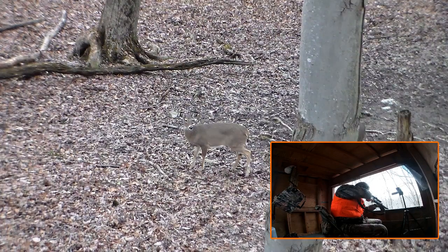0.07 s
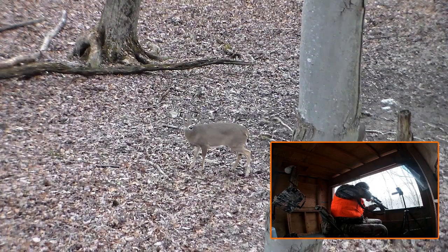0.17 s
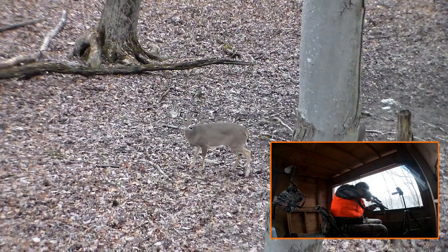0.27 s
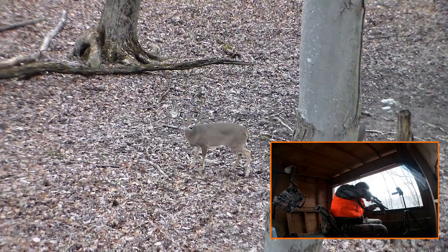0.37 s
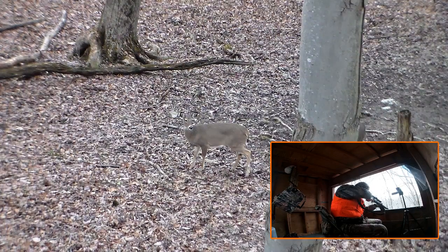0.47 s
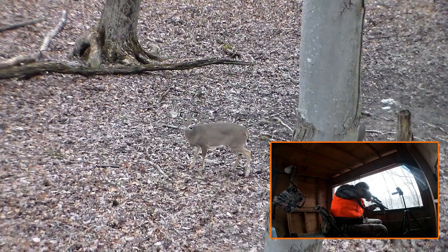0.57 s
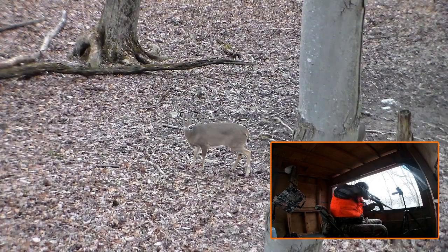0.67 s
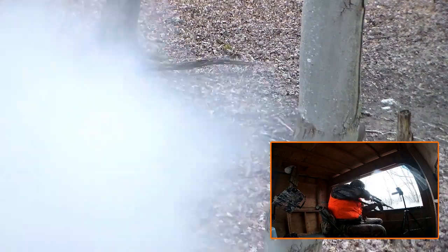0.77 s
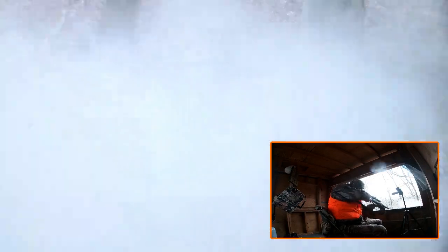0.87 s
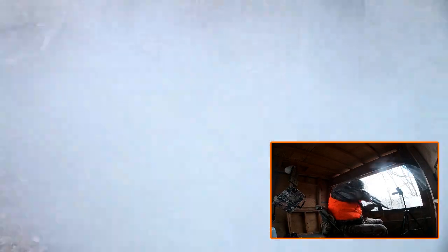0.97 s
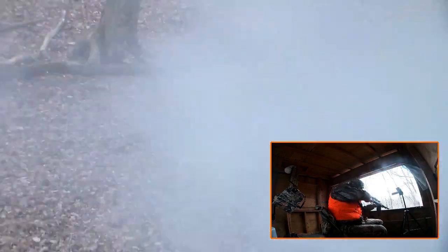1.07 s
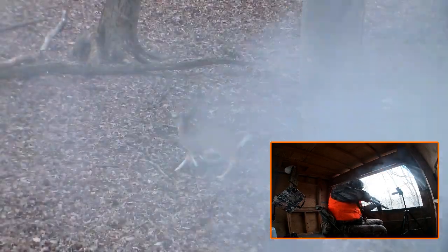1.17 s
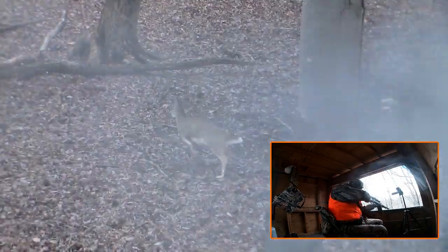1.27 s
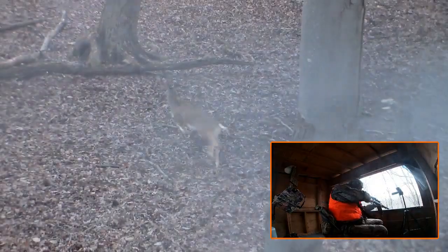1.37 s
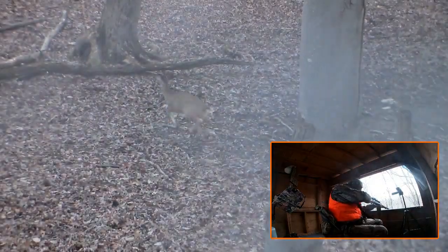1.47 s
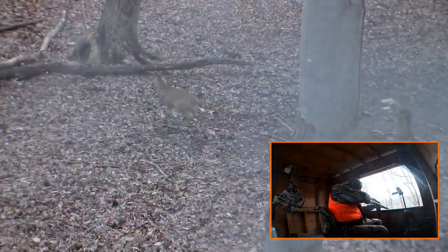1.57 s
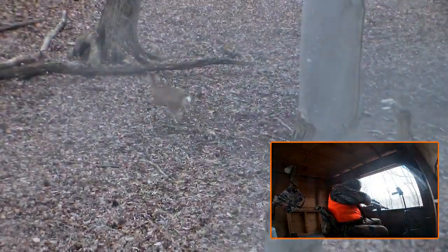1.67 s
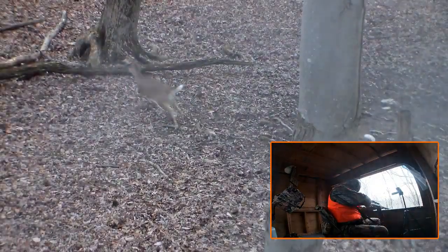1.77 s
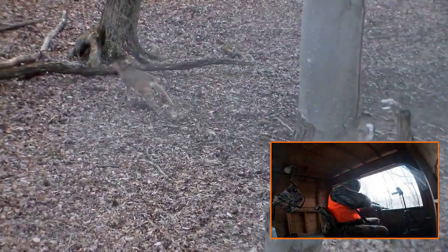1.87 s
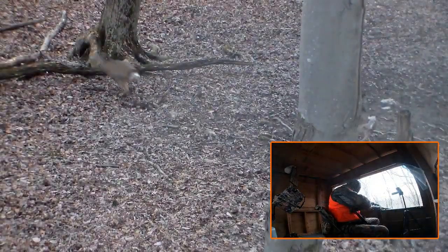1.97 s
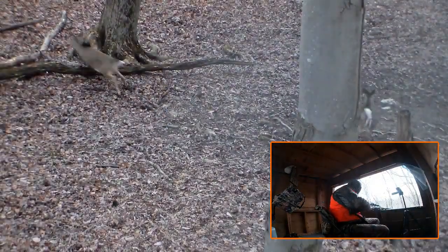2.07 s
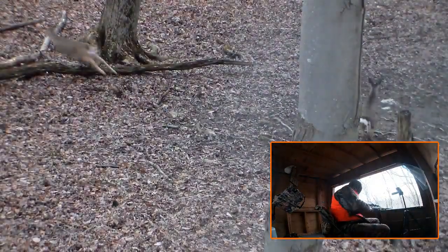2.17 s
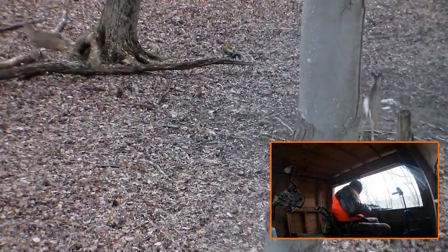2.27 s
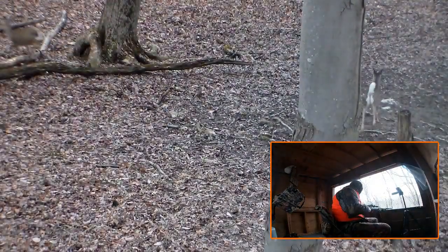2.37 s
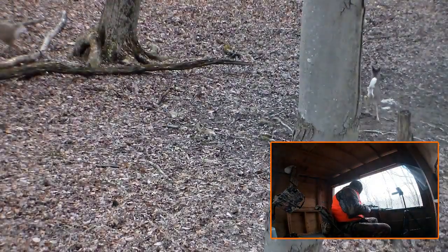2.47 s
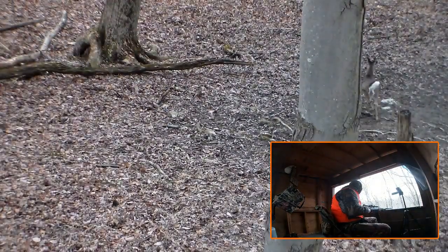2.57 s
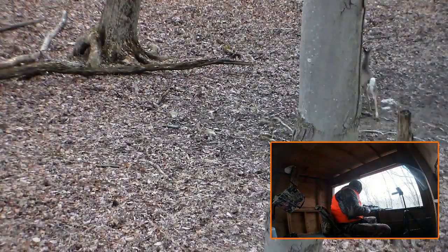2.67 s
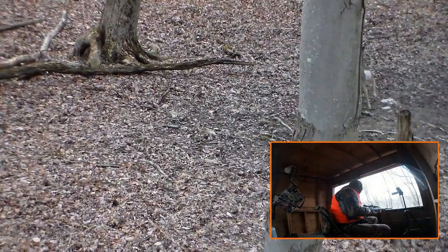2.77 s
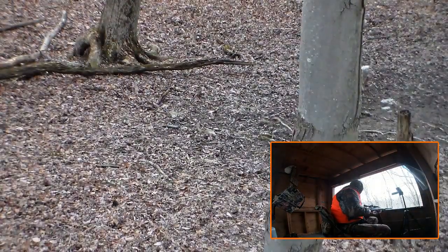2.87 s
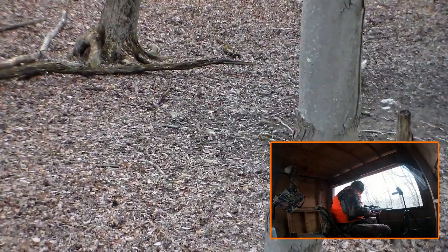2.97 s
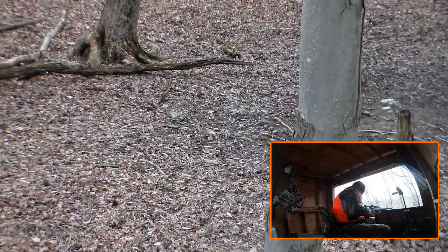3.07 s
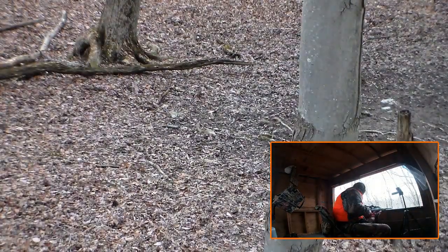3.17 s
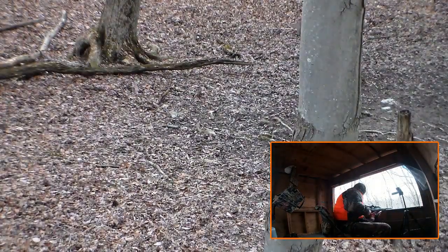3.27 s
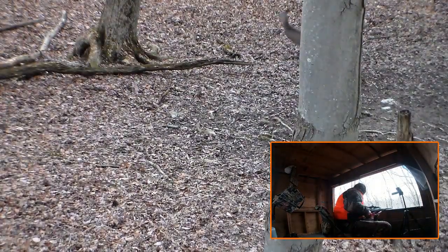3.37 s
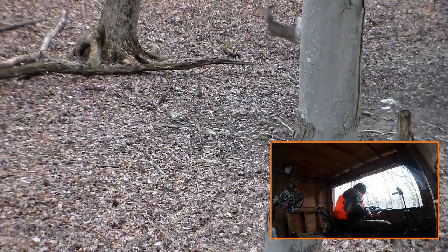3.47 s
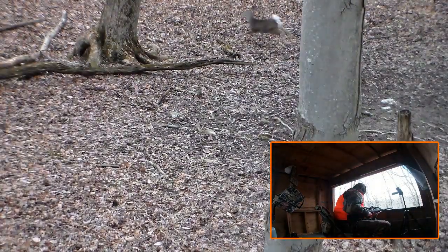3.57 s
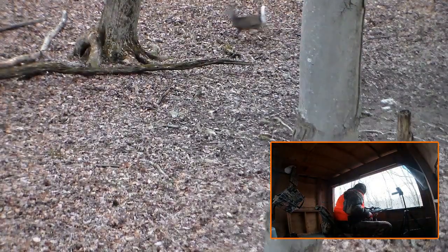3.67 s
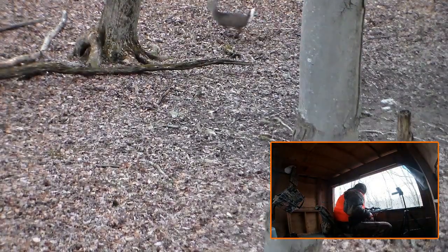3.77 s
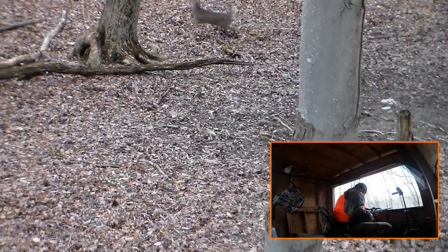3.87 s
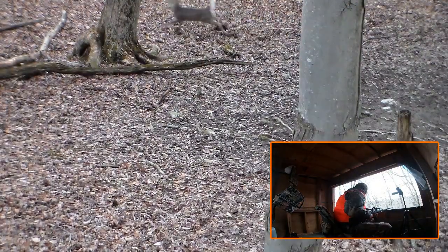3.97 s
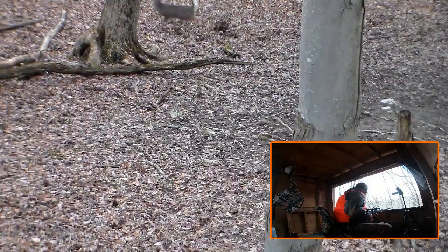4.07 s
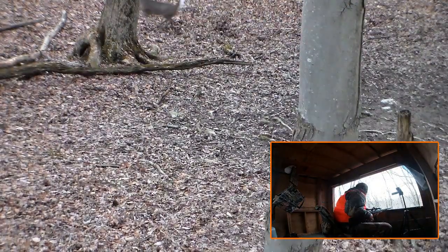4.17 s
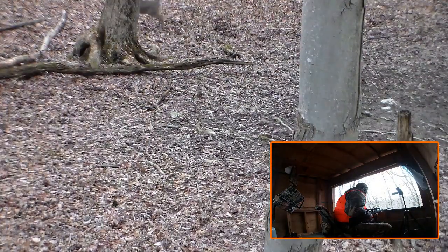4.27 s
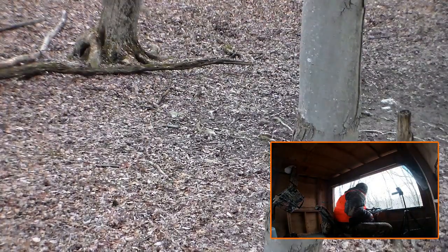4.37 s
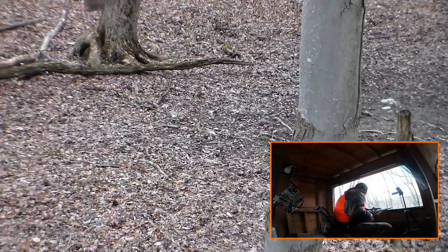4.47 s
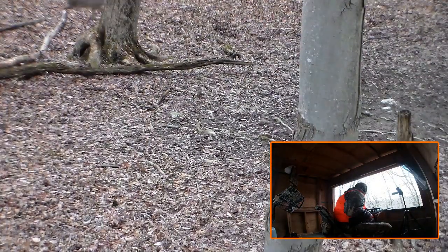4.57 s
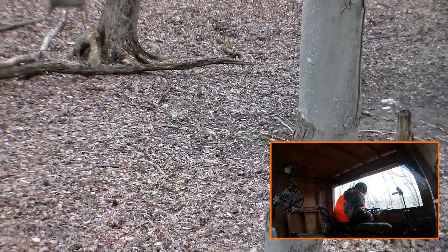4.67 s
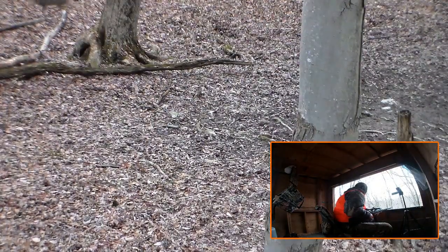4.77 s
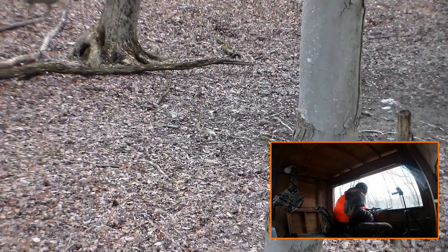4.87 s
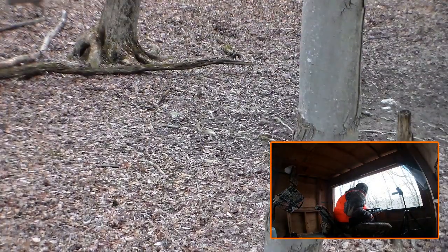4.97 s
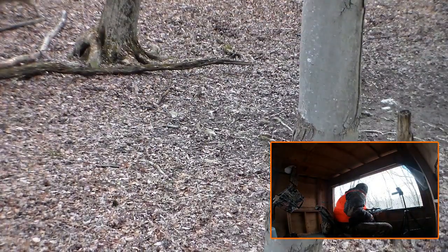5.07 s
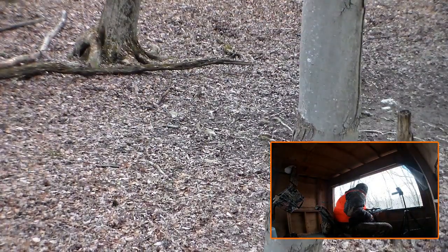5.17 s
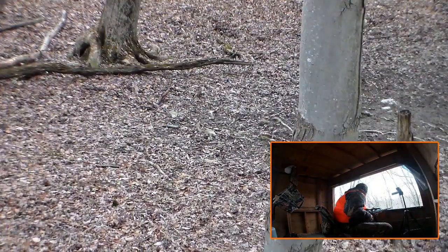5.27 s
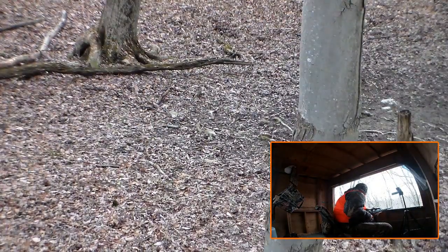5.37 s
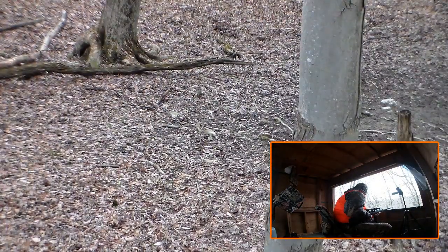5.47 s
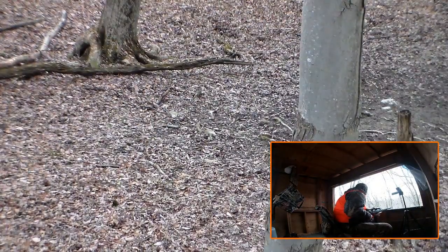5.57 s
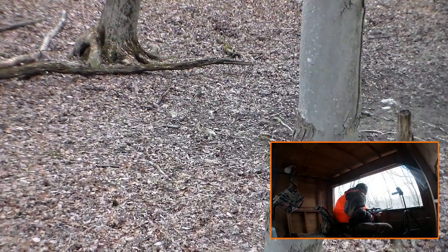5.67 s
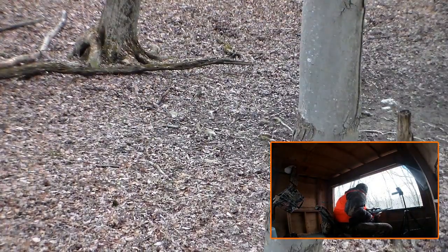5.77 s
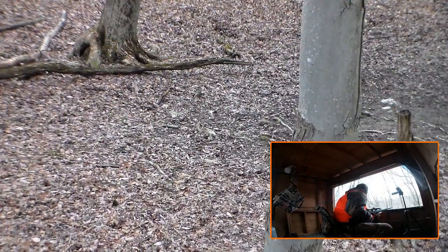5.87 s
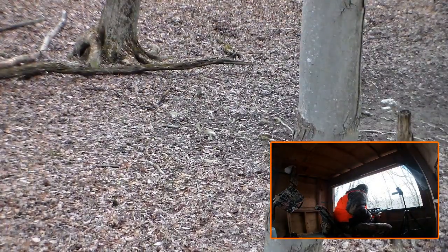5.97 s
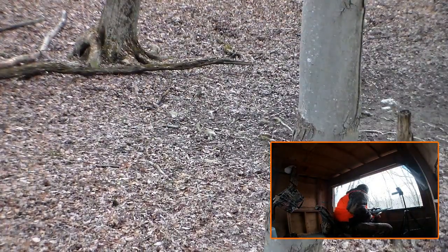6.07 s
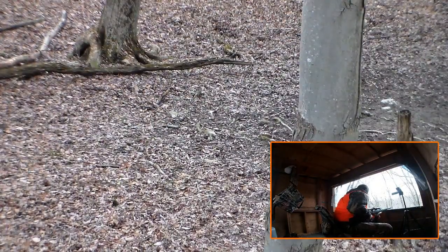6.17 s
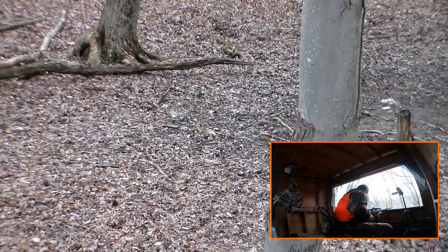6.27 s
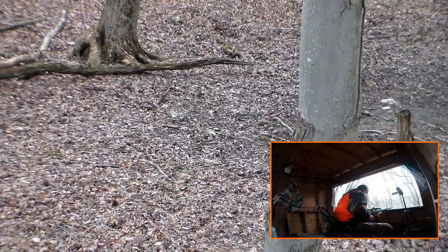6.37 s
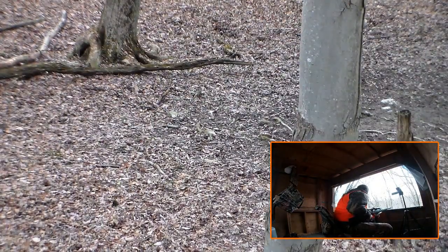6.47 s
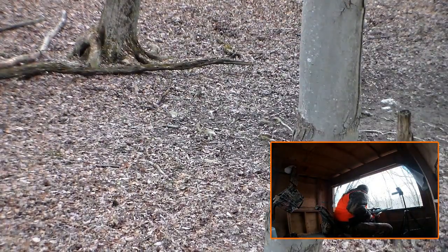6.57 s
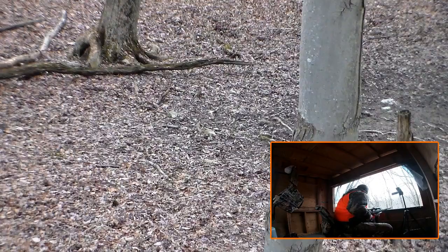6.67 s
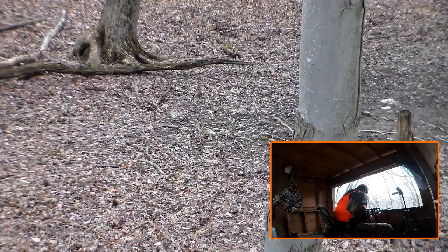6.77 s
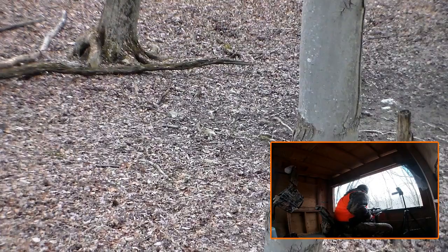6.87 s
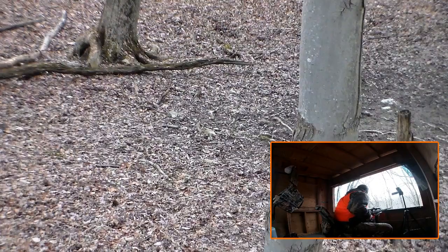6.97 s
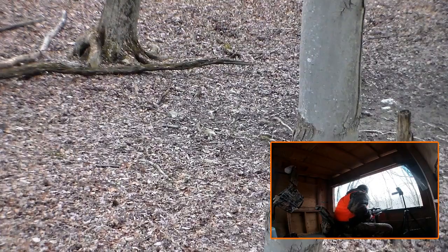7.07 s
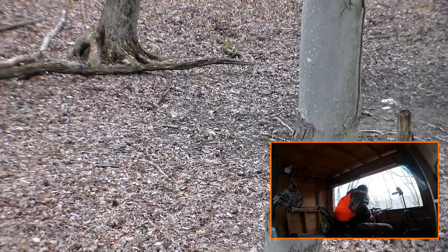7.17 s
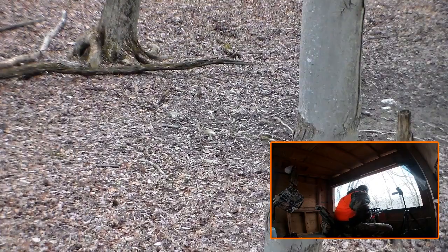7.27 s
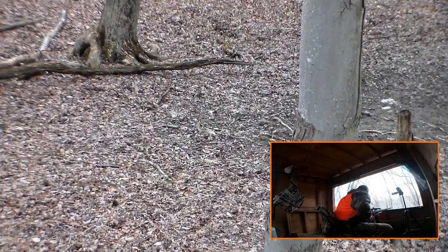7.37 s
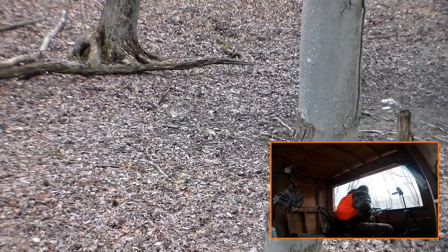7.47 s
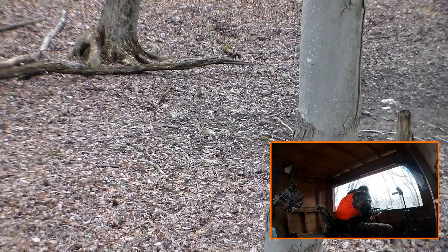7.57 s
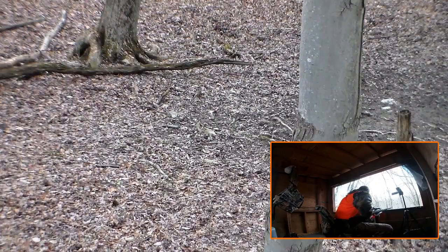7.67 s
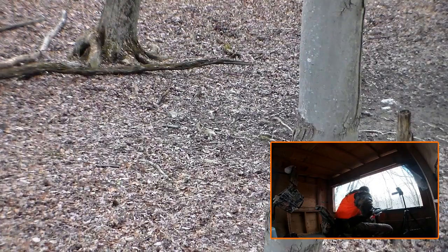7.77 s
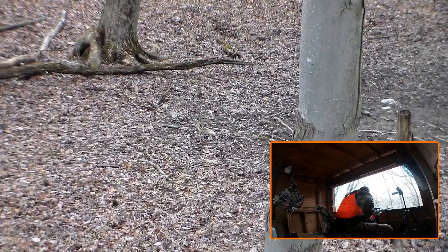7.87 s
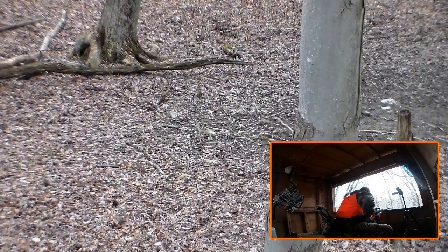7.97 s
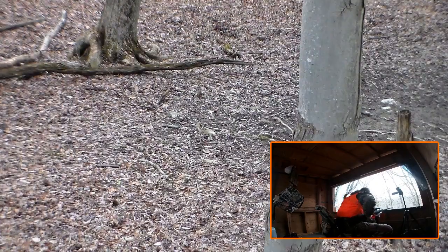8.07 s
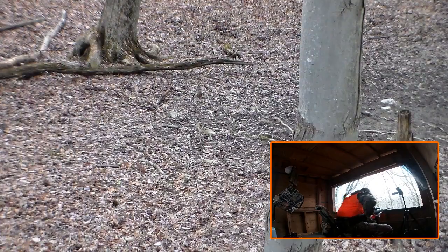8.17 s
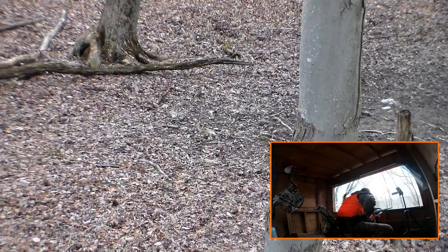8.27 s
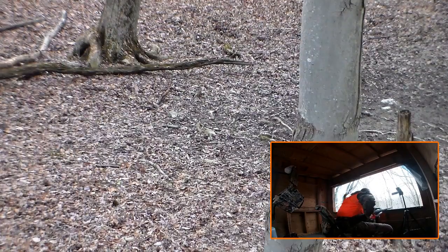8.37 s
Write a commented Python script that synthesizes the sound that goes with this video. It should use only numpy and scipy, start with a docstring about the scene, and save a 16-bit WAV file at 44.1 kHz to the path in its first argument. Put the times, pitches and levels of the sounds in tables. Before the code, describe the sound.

Wind thumps against an outdoor stereo microphone for under a second, then a muzzle-loading rifle goes off close by, loud enough to overload it. Sharp echoes slap back from nearby trunks, and a dull roll with a low note returns from the hills for several seconds. Beneath it deer flee through dry leaves, crunching and snapping twigs, gradually fading toward the left.

```python
"""A black-powder rifle fires close by in bare woodland: a pressure pulse strong enough to overload the recorder.
Noise that fades at its own rate in each pitch range is the scatter off nearby trunks, with a few sharper echoes.
The hills roll the shot back for seconds, as noise that grows ever duller, over a low note.
Startled deer bound off through dry leaves: patchy noise, with crunches and short ringing twig snaps.
Gusts are low noise that swells, and single pops, on both microphone ports; the recorder hisses quietly."""
import sys
import numpy as np
from scipy import signal
from scipy.fft import rfft, irfft, next_fast_len
from scipy.io import wavfile
from scipy.ndimage import uniform_filter1d, map_coordinates

SR = 44100
rng = np.random.default_rng(int(sys.argv[2]) if len(sys.argv) > 2 else 0)


def to_wav(s):
    """Save 16-bit WAV."""
    ch = np.atleast_2d(s).T  # columns
    pcm = np.round(np.clip(ch, -1, 1) * 32767)  # PCM
    wavfile.write(sys.argv[1], SR, pcm.astype(np.int16))


N = 370704
TIME = np.arange(N) / SR

# In every tone table only the balance between pitches counts: the noise is scaled to rms 1 afterwards.
# Likeness: 1 = the same sound in both ports, 0 = unrelated. Left-right: above 0 = louder on the left.

# Gusts: t/s, buffeting level/dB, left-right/dB
GUSTS = [(0.0, -49, 0), (0.21, -52, 8), (0.25, -37, 1), (0.3, -42.5, 6), (0.36, -32, 1), (0.52, -29, 3.5),
         (0.63, -32, 4), (0.68, -43.5, 6), (0.85, -32.5, 9), (1.3, -49, -1), (1.9, -43.5, 6),
         (2.3, -36.5, 8), (2.55, -46.5, -4), (3.17, -35, 6), (3.35, -39.5, 2), (3.65, -38, 1),
         (4.3, -45.5, 0), (4.8, -44, 3), (5.4, -43.5, 4), (5.65, -29, 2), (5.78, -43, 7), (5.95, -36, 1),
         (6.2, -36, 2.5), (6.5, -39.5, 3), (6.8, -46, -7), (7.2, -44, 5.5), (7.5, -48, 1), (7.67, -32, 1),
         (7.85, -41.5, 3), (8.41, -48, -2)]
# Tone of the buffeting: f/Hz, level per Hz/dB
BUFFET_TONE = [(35, -13.5), (60, 2), (100, 2), (180, -13), (300, -22), (500, -49.5), (1500, -110)]
# Tone of the deepest moving air, and of the higher thumps: f/Hz, level per Hz/dB
RUMBLE_TONE = [(8, -17), (20, 14.0), (45, 11.5), (70, -33.5), (300, -110)]
THUMP_TONE = [(80, -19.5), (160, 7.5), (300, -10.5), (600, -28.5), (1200, -47.5), (3000, -110)]
# How alike the ports are in rumble, buffeting, thumps and hiss: f/Hz, likeness
RUMBLE_ALIKE, BUFFET_ALIKE, THUMP_ALIKE, HISS_ALIKE = [(30, .46)], [(100, .1)], [(100, .08)], [(500, .1)]
# Single eddies that pop: t/s, peak level/dB, f/Hz, left-right/dB
EDDIES = [(0.325, -27.5, 100, 0), (0.376, -17.5, 184, 30), (.392, -17, 123, 30), (0.406, -17, 124, -30),
          (0.476, -19, 130, -27), (0.487, -18, 169, 30), (0.506, -15.5, 220, 30), (0.522, -14, 159, 8),
          (0.532, -18, 264, 30), (0.569, -18.5, 109, 30), (0.625, -16, 119, 30), (0.723, -25, 125, 10),
          (5.669, -20, 88, 9), (5.871, -20.5, 90, 6), (5.975, -23, 122, -13), (6.074, -31, 110, 17),
          (6.18, -20, 110, -14), (6.218, -21, 100, 12), (7.36, -18.5, 129, 17), (7.642, -18, 100, 20),
          (7.687, -20, 90, 8), (7.79, -22, 196, 12), (7.834, -25.5, 121, -11), (7.863, -29.5, 300, 3)]
# Tone of the recorder's own noise: f/Hz, level per Hz/dB
HISS_TONE = [(200, -30), (320, -2), (500, 1), (1250, -9), (1350, -8), (2160, -10), (7480, -15.5),
             (14000, -16.5)]
# The cap, which fires just before the blast: t/s, level/dB, time to fall 60 dB/s
CAP_BURST = (.8635, -21, .15)
# Tone of the cap: f/Hz, level per Hz/dB
CAP_TONE = [(800, -25), (2600, 0), (5000, -6), (7500, -8), (14000, -16)]
# Scatter off near trunks, plus the ring of the hunting blind near 186 Hz: f/Hz, level per Hz/dB, build-up/s,
# longest time to fall 60 dB/s
TRUNKS = [(25, 0, 0.026, 0.39), (60, 4.5, .04, .35), (116.7, 8.5, 0.069, 0.33), (186, 22.5, 0.051, 0.42),
          (279.7, 15, .035, 0.21), (367, 17, 0.051, 0.51), (576, 14, 0.019, 0.33), (835, 12.5, 0.039, 0.45),
          (1500, 5, 0.024, 0.44), (2703, 4.5, .002, 0.44), (4970, -2.5, .001, 0.43),
          (7550, -7.5, 0.0011, 0.48), (12100, -7, 0.0011, 0.43)]
# How alike the ports are in the cap, trunks and slaps: f/Hz, likeness
TRUNKS_ALIKE = [(60, 0.93), (230, 0.98), (900, 0.99), (3510, 0.59), (13600, 0.073)]
# Distinct echoes off big trunks and banks: t/s, level/dB, time to fall 60 dB/s
SLAP_ECHOES = [(0.983, -1.5, 0.07), (1.013, -5.5, 0.06), (1.077, -11.5, 0.24), (1.123, -16, 0.11),
               (1.164, -21, 0.039), (1.216, -14.5, 0.037), (1.25, -24, .05)]
# Tone of those echoes before air loss: f/Hz, level per Hz/dB
SLAP_ECHO_TONE = [(100, -20.5), (300, -6), (900, 2), (2000, -11), (4200, -9), (8000, -27), (15000, -31)]
# Loss in the air on the way, used for the hills and, multiplied, for the slaps: f/Hz, loss per second/dB
AIR_LOSS = [(200, -1), (500, -0.47), (1000, 1.5), (2000, 5), (4000, 22.5), (8000, 45)]
# Echo off the hills: t/s, level of the roll/dB, level of the low note over the roll/dB
HILL_LEVELS = [(1.1, -14, 4.5), (1.29, -29, -8), (1.4, -28.5, -3.5), (1.5, -25, -7.5), (1.8, -24, -9.5),
               (2.03, -27, -12), (2.3, -31.5, -9), (2.5, -32.5, -3.5), (2.65, -31.5, -3), (3.0, -30, 0),
               (3.3, -31, -3), (4.0, -33, -3), (4.6, -35.5, -4.5), (5.0, -35.5, -6), (5.3, -38, -4),
               (5.55, -43.5, -6), (6.05, -50.5, -2), (7.0, -57, -5)]
# Tone of the roll at 1.6 s, brighter before and duller after: f/Hz, level per Hz/dB
ROLL_TONE = [(150, -37), (250, 0.5), (304, -3), (509, -1), (940, -3.5), (1710, -11.5), (2430, -15.5),
             (3160, -19.5), (7000, -49), (9100, -56), (15400, -120)]
# Tone of the valley's low note: f/Hz, level per Hz/dB
BOOM_TONE = [(90, -28), (130, 6), (160, 13), (190, 18), (230, 19), (270, -9), (330, -32), (600, -100)]
# How alike the ports are in the hill echo: f/Hz, likeness
HILL_LIKENESS = [(60, 1), (230, 1), (900, 0.98), (3510, 0.84), (13600, 0.18)]
# Many hooves in leaf litter: t/s, level/dB
RUSTLE_LEVELS = [(1.25, -64), (1.6, -56.5), (1.85, -49.5), (2.0, -43.5), (2.4, -41), (2.8, -43), (3.1, -44),
                 (3.4, -44.5), (3.8, -46.5), (4.1, -45), (4.5, -47), (4.75, -51.5), (4.98, -53),
                 (5.15, -47.5), (5.3, -52), (5.6, -50.5), (5.84, -52), (6.0, -50), (6.42, -48.5),
                 (6.55, -53.5), (6.82, -57), (6.92, -52), (7.1, -51.5), (7.3, -56), (7.7, -48), (8.41, -49)]
# Tone of the leaves: f/Hz, level per Hz/dB
LEAF_TONE = [(250, -14), (400, -3), (550, -6), (950, -7), (1600, -9), (2100, -10), (3000, -8.5), (3600, -8),
             (4200, -10), (5000, -12.5), (8000, -16), (11000, -19.5), (14000, -23)]
# How alike the ports are in the leaves: f/Hz, likeness
LEAF_LIKENESS = [(500, 0.97), (1500, 0.94), (4000, 0.81), (8000, 0.23), (14000, 0.37)]
# Landings that snap a twig, snap and spray before their tone: t/s, snap peak level/dB, f/Hz,
# leaf spray level/dB, crunch level/dB
LANDINGS = [(1.8524, -32, 2040, -49, -46), (1.935, -40, 4500, -54, -42), (2.143, -15.5, 3600, -33, -27),
            (2.507, -29, 3550, -48, -42), (2.5366, -26, 4410, -37, -32), (2.64, -20.5, 3450, -52, -31),
            (2.80, -40, 3500, -43, -38), (2.9176, -12, 3520, -34.5, -48), (3.0131, -28, 4010, -44, -39),
            (3.173, -16, 3040, -37, -33.5), (3.26, -40, 3500, -45, -43), (3.38, -44, 3500, -51, -46),
            (3.6601, -29, 2970, -43, -42), (3.716, -37, 3640, -41, -41), (3.8157, -38, 4300, -44, -48),
            (3.8651, -29, 3730, -48, -53), (3.98, -42, 3500, -51, -44), (4.114, -37, 3600, -38, -48),
            (4.151, -27, 2980, -43, -52), (4.6228, -41, 3350, -51, -44), (4.8439, -35, 2830, -46, -46),
            (5.0605, -43, 2910, -55, -44), (5.3705, -37, 2980, -46.5, -49), (5.878, -37, 2600, -49, -45),
            (5.9194, -38, 3110, -47, -55), (6.3903, -40, 3100, -47, -50), (7.004, -34, 2930, -51, -55),
            (7.3218, -48.5, 3840, -54, -50), (7.7895, -45, 2380, -61, -58), (7.861, -41, 3360, -58, -61)]
# Tone of the crunch: f/Hz, level per Hz/dB
CRUNCH_TONE = [(700, -30), (2000, -6), (3300, 1), (5000, -2), (9500, -6.5), (14000, -14)]
# Tone of the snaps and sprays, here a plain gain: f/Hz, gain/dB
SNAP_TONE = [(600, -39), (1800, 6.5), (4300, 2), (6000, -6), (14000, -10)]
# The deer move left: t/s, how much later the right port hears them/microseconds
DEER_BEARING = [(1.6, -9), (3.5, 23), (5, 26), (6, 38), (8.41, 48)]

FLURRY_DB, FLURRY_PER_S = 1.7, 11  # short flurries on the gusts
SWAY_DB = 2.5  # how far the flurries wander between the ports
RUMBLE_DB, RUMBLE_FOLLOWS = -45, .4  # deepest air: middle level, share of the gust's swing
RUMBLE_HEAVE_DB, RUMBLE_HEAVES_PER_S = 3, 7  # its own slow heave
THUMP_DB = 21.5  # gain on the square of the buffeting level
HISS_DB = -60
SHOT_S = .8726  # the muzzle blast arrives
TRUNK_AIR_DB_PER_S = 30.5  # air loss among the trunks at 12 kHz
FADE_S, FADE_DB_PER_S = 6.9, 3  # the last slope has answered: an extra fade starts
PEAL_DB, BOOM_BEAT_DB, BOOM_BEAT_PER_S = 0.82, 0.5, 9  # how unevenly the slopes answer
SHUFFLE_DB, SHUFFLE_PER_S = 0.94, 15  # the rustle comes and goes with the strides
CRUNCH_RISE_S, CRUNCH_T60_S = 0.0074, 0.11  # build-up, and time to fall 60 dB up to 2 s
SMEAR_PER_S = .3  # crunches last longer by this share for each second after 2 s, as the deer get away
TOP_HZ = 14250  # about the highest pitch kept


def amp(db):
    """Turn decibels into a plain multiplier."""
    return 10 ** (np.asarray(db) / 20)


def unit(x):
    """Scale a signal to rms 1."""
    return x / np.sqrt(np.mean(x ** 2) + 1e-20)


def along(points, hz, axis=1):
    """Read one column of a table that starts with f/Hz, with pitch on a log scale."""
    rows = np.array(points, float)
    return np.interp(np.log(hz + 1), np.log(rows[:, 0] + 1), rows[:, axis])


def curves(rows):
    """Draw each column after t/s as a curve with one value per sample."""
    s, *columns = np.transpose(rows)
    return [np.interp(TIME, s, column) for column in columns]


def wobble(rate):
    """Draw a smooth random curve with rate random points a second."""
    points = rng.standard_normal(int(N * rate / SR) + 4)
    return map_coordinates(points, [TIME * rate])


def filtered(x, response):
    """Multiply each frequency of x by response(hz)."""
    size = next_fast_len(N + SR // 2)
    hz = np.fft.rfftfreq(size, 1 / SR)
    return irfft(rfft(x, size) * response(hz), size)[..., :N]


def rush(spectrum, alike):
    """Steady stereo noise of rms 1: a shared part plus a part of opposite sign in the two ports."""
    def response(hz):
        turn = np.arccos(np.clip(along(alike, hz), -1, 1)) / 2
        return amp(along(spectrum, hz)) * [np.cos(turn), np.sin(turn)]
    mid, side = filtered(rng.standard_normal((2, N)), response)
    return unit(np.array([mid + side, mid - side]))


def shaped(x, gain, size):
    """Change the tone of x over time: multiply by gain(hz, s) in short slices."""
    hz, s, slices = signal.stft(x, SR, nperseg=size)
    return signal.istft(slices * gain(hz[:, None], s[None]), SR, nperseg=size)[1][:, :N]


def burst(s, db, t60, rise):
    """Envelope that swells fast from time s and dies away by 60 dB in t60 seconds."""
    age = np.clip(TIME - s, 0, 5)
    return (1 - np.exp(-age / rise)) * amp(db - 60 * age / np.abs(t60))


def panned(lean_db):
    """Left and right gains that differ by lean_db."""
    return amp(np.array([[.5], [-.5]]) * lean_db)


def eddies():
    """Single eddies pop as one short swing of air, often weaker on one port."""
    half = SR // 10
    pops, t = np.zeros((2, N + SR)), np.arange(-half, half) / SR
    phases = rng.uniform(0, 2 * np.pi, len(EDDIES))
    for (s, db, hz, lean_db), phase in zip(EDDIES, phases):
        u = 2 * np.pi * hz * t
        swing = np.sin(u + phase) * (1 + (u / 2.8) ** 2) ** -3
        ports = amp([[db + min(lean_db, 0)], [db - max(lean_db, 0)]])  # only the weaker port is lowered
        start = round(s * SR) - half
        pops[:, start:start + len(t)] += ports * swing
    return pops[:, :N]


def wind():
    """Eddies thump on each port apart; thumps above the buffeting grow with the square of the gust."""
    gust_db, lean_db = curves(GUSTS)
    lumps = amp(6 * np.tanh(np.array([wobble(25), wobble(25)])))
    heave_db = RUMBLE_DB + RUMBLE_FOLLOWS * (gust_db - gust_db.mean())
    heave_db += RUMBLE_HEAVE_DB * wobble(RUMBLE_HEAVES_PER_S)
    rumble = amp(heave_db) * rush(RUMBLE_TONE, RUMBLE_ALIKE)
    sway = panned(lean_db + SWAY_DB * wobble(FLURRY_PER_S))
    gust = sway * amp(gust_db + FLURRY_DB * wobble(FLURRY_PER_S))
    buffeting = gust * unit(lumps * rush(BUFFET_TONE, BUFFET_ALIKE))
    thumps = amp(THUMP_DB) * gust ** 2 * unit(lumps ** 2 * rush(THUMP_TONE, THUMP_ALIKE))
    return rumble + buffeting + thumps + eddies()


def hiss():
    """The recorder's own noise, steady and nearly separate in the two ports."""
    return amp(HISS_DB) * rush(HISS_TONE, HISS_ALIKE)


def trunks():
    """Trunks scatter the blast: the bass builds late and the treble dies first, partly through air loss."""
    def scatter(hz, s):
        age = np.clip(s - SHOT_S + .004, 0, None)
        # air loss grows with the path and the square of the frequency
        air_db = -TRUNK_AIR_DB_PER_S * age * (hz / 12000) ** 2
        t60 = np.minimum(along(TRUNKS, hz, axis=3), 4500 / (hz + 1))
        build_up = 1 - np.exp(-(age / along(TRUNKS, hz, axis=2)) ** 2)
        return amp(air_db - 60 * age / t60) * build_up
    noise = shaped(rush(TRUNKS, TRUNKS_ALIKE), scatter, size=256)
    uneven = amp(10.2 + 2.2 * wobble(60))  # trunks stand unevenly
    return uneven * panned(.8) * (TIME >= SHOT_S) * noise


def slaps():
    """Big trunks and banks send back distinct echoes, duller the later they arrive."""
    echoes = sum(burst(*row, rise=0.0012) for row in SLAP_ECHOES) * rush(SLAP_ECHO_TONE, TRUNKS_ALIKE)
    return shaped(echoes, lambda hz, s: amp(-3.5 * along(AIR_LOSS, hz) * np.clip(s - 1, 0, None)), size=256)


def shot():
    """The cap cracks, then the blast: a pressure jump that falls through zero, with its near echoes."""
    cap = burst(*CAP_BURST, rise=.0015) * rush(CAP_TONE, TRUNKS_ALIKE)
    u = np.clip(TIME - SHOT_S, 0, 1) / 0.00052  # time counted in pressure-phase lengths of 0.52 ms
    blast = -amp(7) * (TIME >= SHOT_S) * (1 - u) * np.exp(-u)
    # the overdriven microphone capsules swing off centre, over to the other side, and creep back
    age = np.clip(TIME - SHOT_S, 0, None) / np.array([[.03], [.02]])
    drift = np.array([[1.1], [2.2]]) * age * (age - np.array([[1.1], [1.6]])) * np.exp(-age)
    return cap + blast + trunks() + slaps() + drift


def hills():
    """Later echoes have come further, so the air has taken more treble from the roll; a low note joins it."""
    roll_db, boom_db = curves(HILL_LEVELS)

    def air(hz, s):
        return amp(-along(AIR_LOSS, hz) * np.clip(s - 1.6, -.4, None))
    roll = shaped(rush(ROLL_TONE, HILL_LIKENESS), air, size=1024)
    fade_db = FADE_DB_PER_S * np.clip(TIME - FADE_S, 0, None)
    swell = np.clip((TIME - 1.1) / 0.16, 0, 1) * amp(roll_db - fade_db)
    peals = amp(PEAL_DB * wobble(9) + 0.99 * wobble(30))  # single slopes stand out of the roll
    beat_db = BOOM_BEAT_DB * wobble(BOOM_BEAT_PER_S)
    boom = amp(boom_db + beat_db) * rush(BOOM_TONE, HILL_LIKENESS)
    return swell * panned(.9) * (peals * roll + boom)


def rustle():
    """Many hooves crush leaves: a hiss with small grains, patchy in both time and pitch."""
    rustle_db, = curves(RUSTLE_LEVELS)
    grains = (rng.random(N) < 600 / SR) * rng.random(N) ** 2  # about 600 a second
    crackle = uniform_filter1d(grains, size=16)
    litter = rush(LEAF_TONE, LEAF_LIKENESS) * (1 + 0.15 * unit(crackle))

    def patches(hz, s):
        field = rng.standard_normal((hz.size, s.size))
        field = uniform_filter1d(uniform_filter1d(field, size=9, axis=0), size=7, axis=1)
        return amp(1.67 * unit(field))
    litter = unit(shaped(litter, patches, size=256))
    shuffle_db = SHUFFLE_DB * wobble(SHUFFLE_PER_S)
    return np.clip((TIME - 1.15) / 0.15, 0, 1) * amp(rustle_db + shuffle_db) * litter


def landings():
    """Single landings crunch the litter, snap a twig that rings very briefly, and throw a spray of leaves."""
    snaps, crunch = np.zeros(N + SR), np.zeros(N + SR)
    t, age = np.arange(SR // 10) / SR, np.arange(SR // 2) / SR
    for s, db, hz, spray_db, crunch_db in LANDINGS:
        tick = np.sin(2 * np.pi * hz * t) * amp(-60 * t / .0022)
        # spiky noise rings at the pitch of the twig
        grains = unit(np.convolve(rng.standard_normal(len(t)) ** 3, tick[:60])[:len(t)])
        spray = amp(spray_db - 60 * t / 0.12) * (1 - np.exp(-t / 0.0069)) * grains
        snaps[round(s * SR):][:len(t)] += amp(db) * tick + spray
        t60 = CRUNCH_T60_S * (1 + SMEAR_PER_S * max(s - 2, 0))
        build_up = 1 - np.exp(-(age / CRUNCH_RISE_S) ** 2)
        start = round((s - CRUNCH_RISE_S) * SR)
        crunch[start:][:len(age)] += amp(crunch_db - 60 * age / t60) * build_up
    snaps = filtered(snaps[:N], lambda hz: amp(along(SNAP_TONE, hz)))
    return crunch[:N] * rush(CRUNCH_TONE, LEAF_LIKENESS) + snaps


def deer():
    """Rustle and landings move left as their sound reaches the right port ever later than the left."""
    s_lag, lag_us = np.transpose(DEER_BEARING)

    def turn(hz, s):
        # half the lag goes to each port: left earlier, right later
        ports = np.array([1, -1])[:, None, None]
        return np.exp(1j * np.pi * ports * hz * np.interp(s, s_lag, lag_us) / 1e6)
    return panned(0.56) * shaped(rustle() + landings(), turn, size=256)


def scene():
    """Add up wind, hiss, shot, hill echoes and deer."""
    return wind() + hiss() + shot() + hills() + deer()


def record(dry):
    """Peaks are flattened with a sharp knee near full scale, then a steep low-pass removes the top treble."""
    clipped = dry / (1 + np.abs(dry / .99) ** 12) ** (1 / 12)
    return filtered(clipped, lambda hz: np.clip((TOP_HZ + 50 - hz) / 150, 0, 1))


dry = scene()
out = record(dry)
to_wav(out)
```